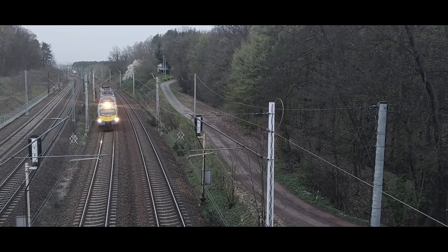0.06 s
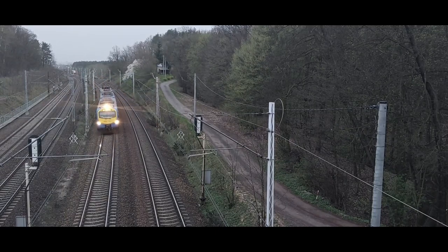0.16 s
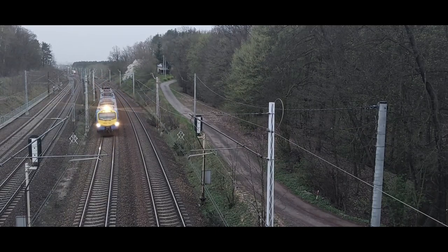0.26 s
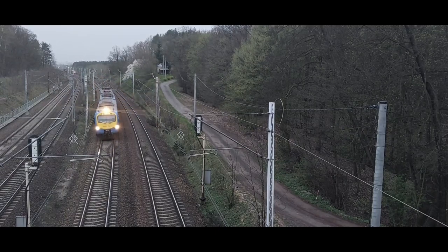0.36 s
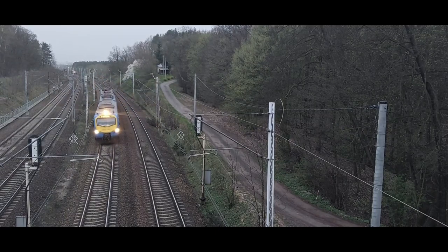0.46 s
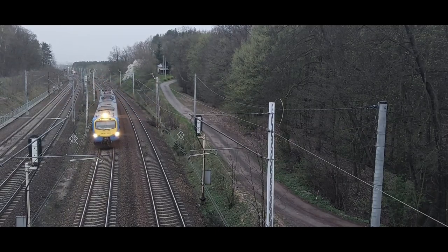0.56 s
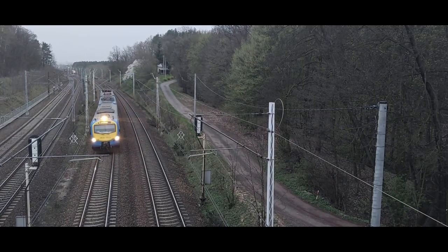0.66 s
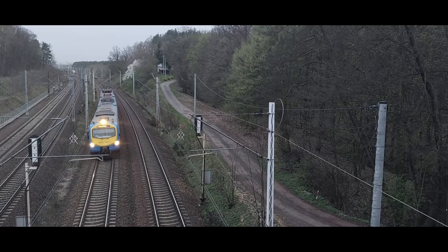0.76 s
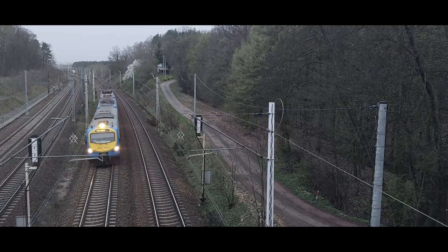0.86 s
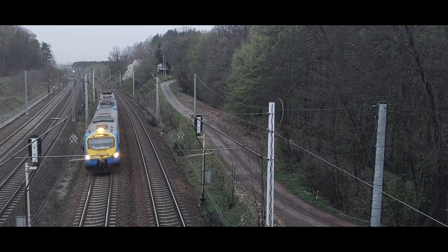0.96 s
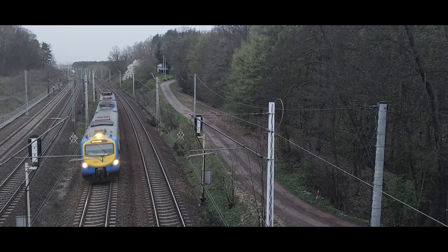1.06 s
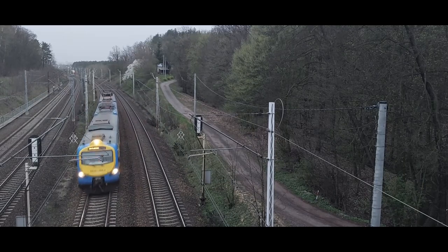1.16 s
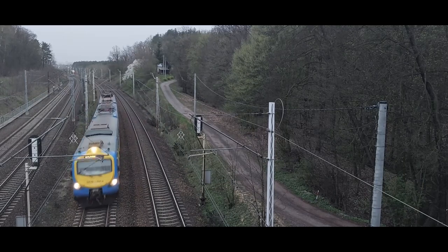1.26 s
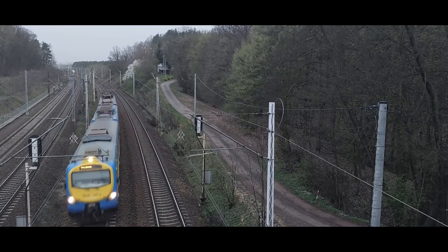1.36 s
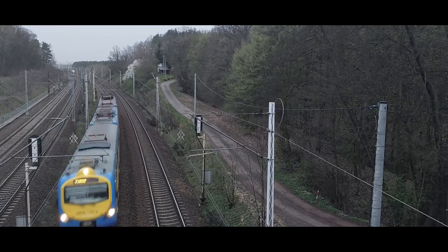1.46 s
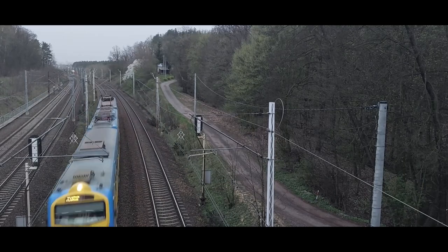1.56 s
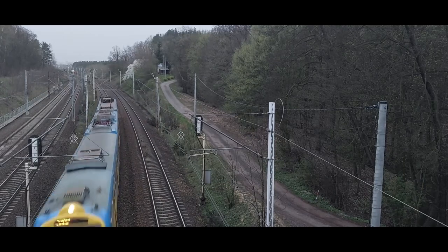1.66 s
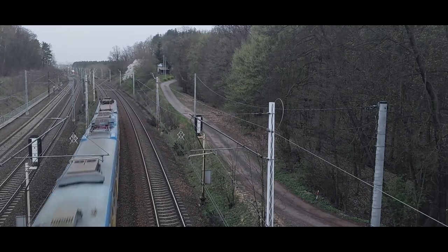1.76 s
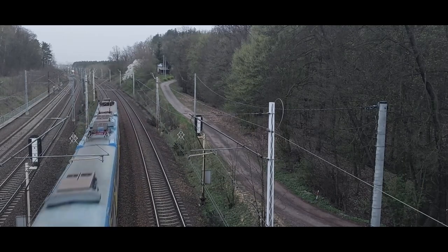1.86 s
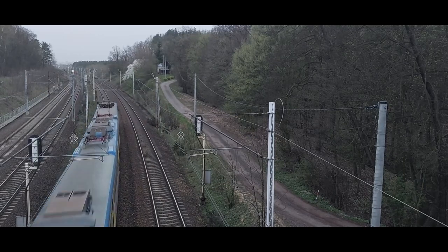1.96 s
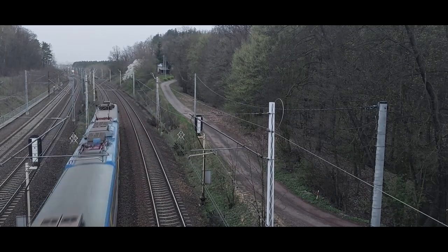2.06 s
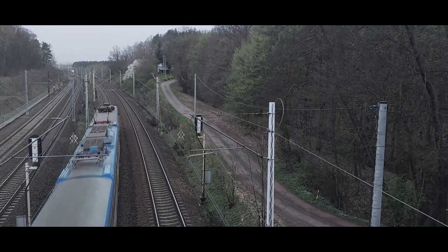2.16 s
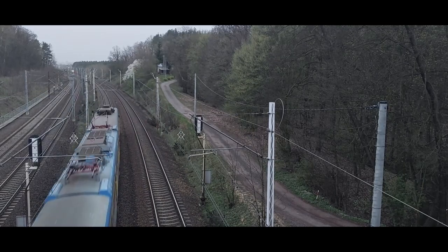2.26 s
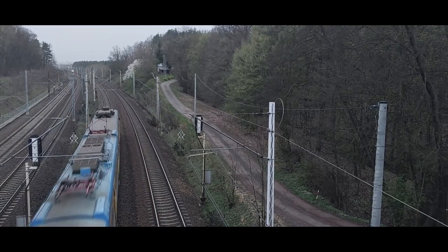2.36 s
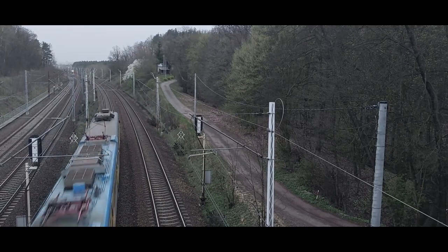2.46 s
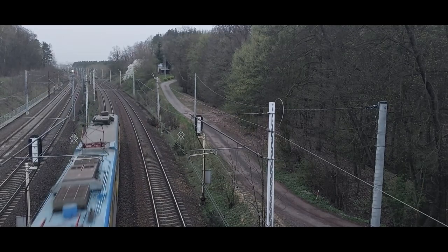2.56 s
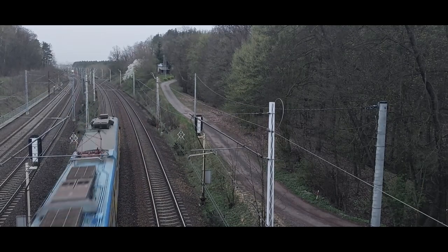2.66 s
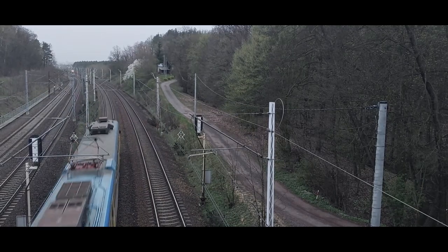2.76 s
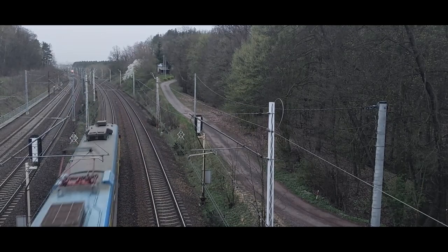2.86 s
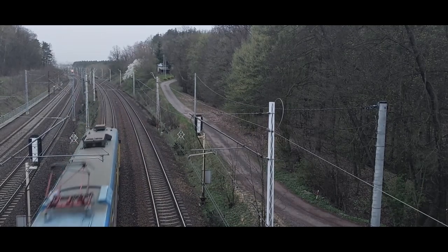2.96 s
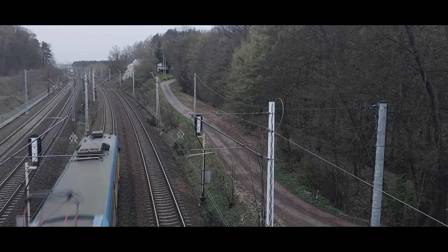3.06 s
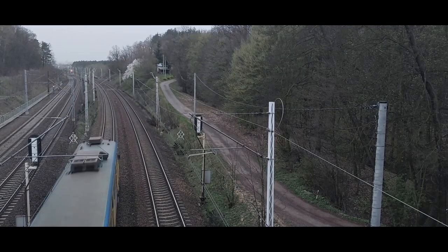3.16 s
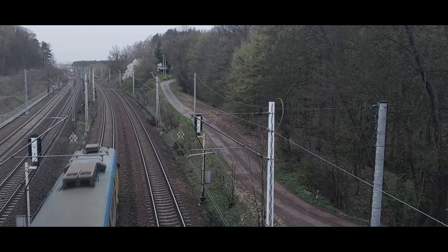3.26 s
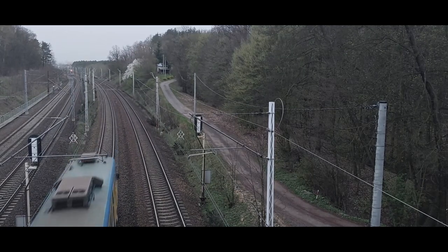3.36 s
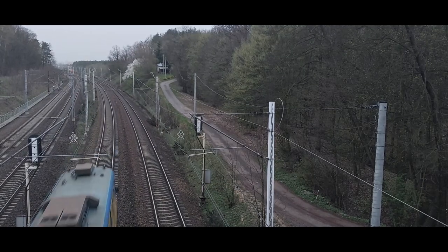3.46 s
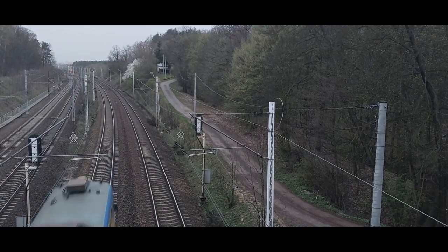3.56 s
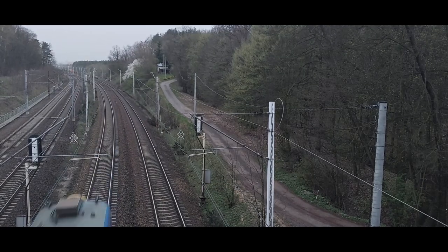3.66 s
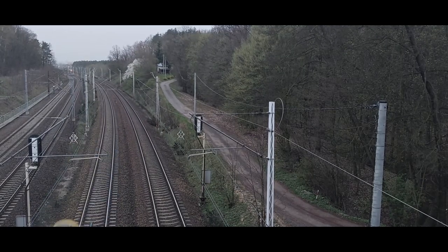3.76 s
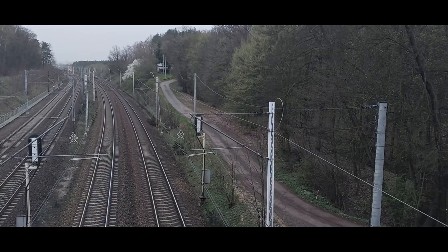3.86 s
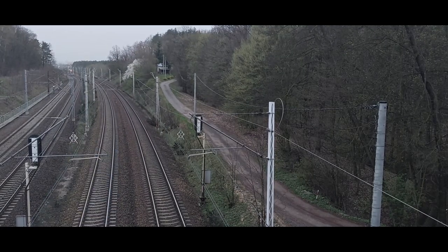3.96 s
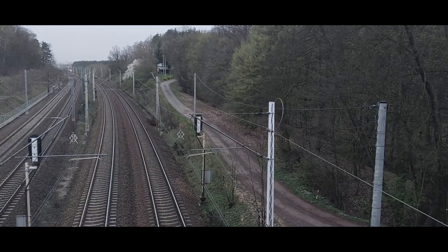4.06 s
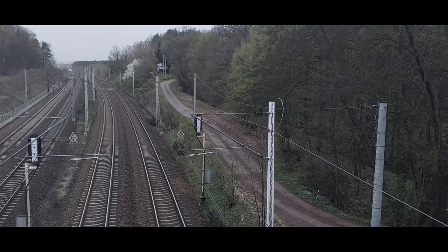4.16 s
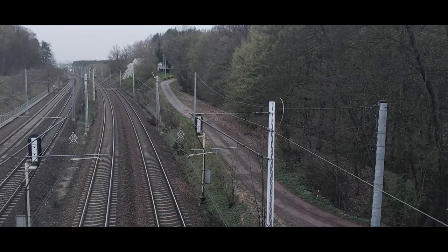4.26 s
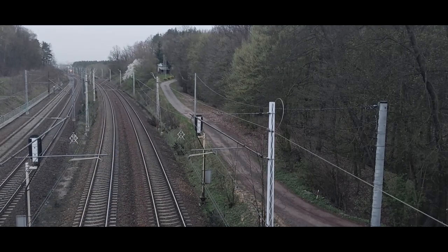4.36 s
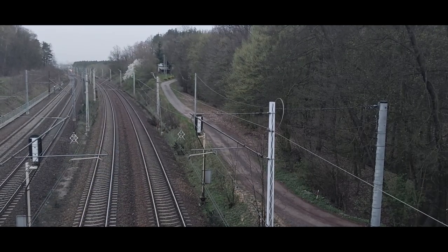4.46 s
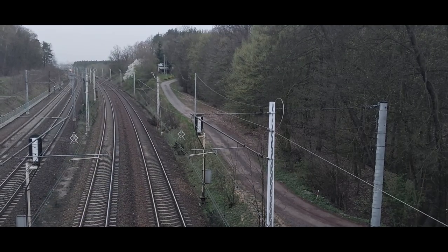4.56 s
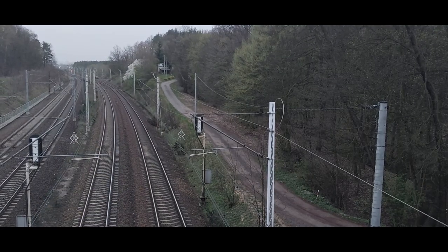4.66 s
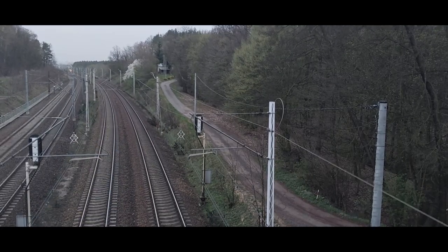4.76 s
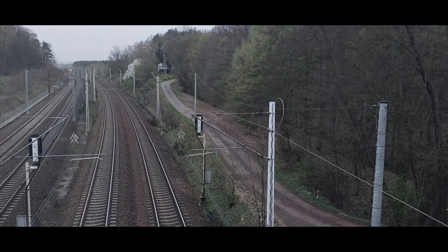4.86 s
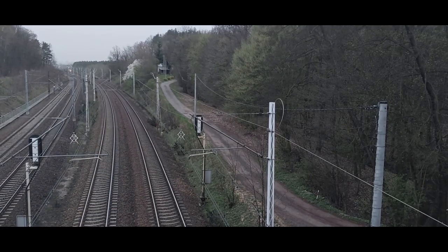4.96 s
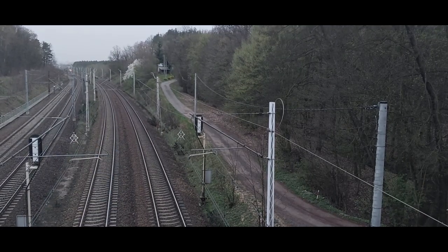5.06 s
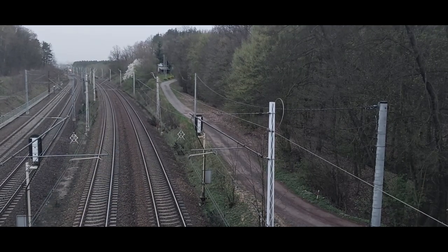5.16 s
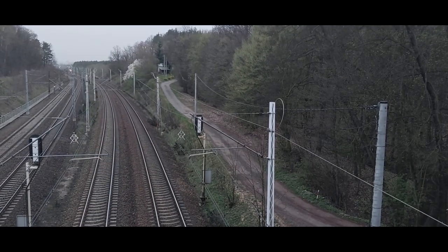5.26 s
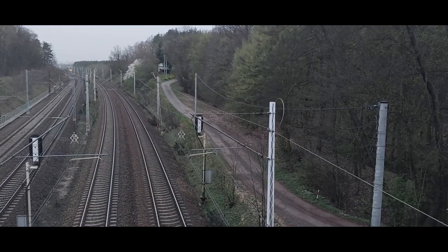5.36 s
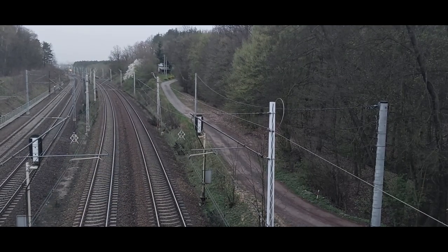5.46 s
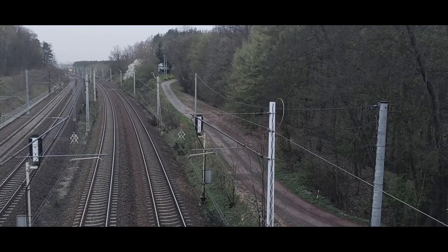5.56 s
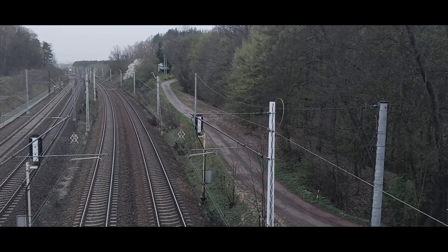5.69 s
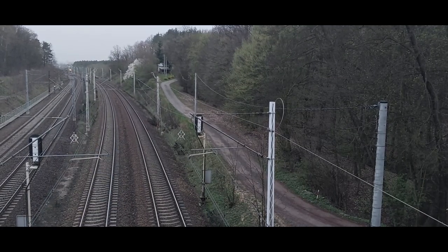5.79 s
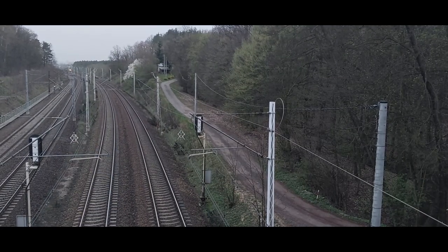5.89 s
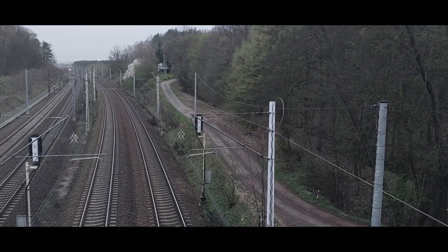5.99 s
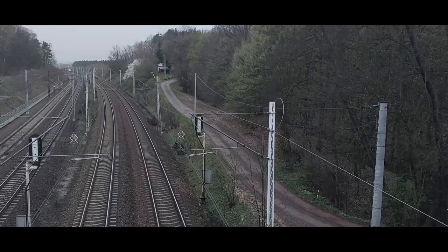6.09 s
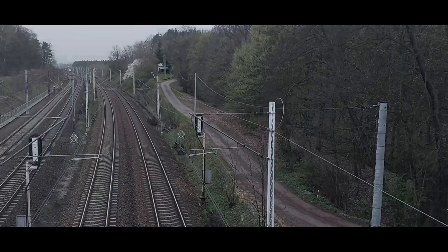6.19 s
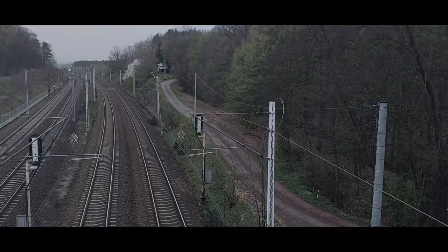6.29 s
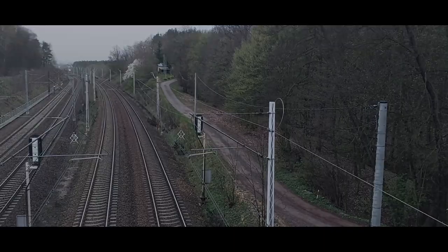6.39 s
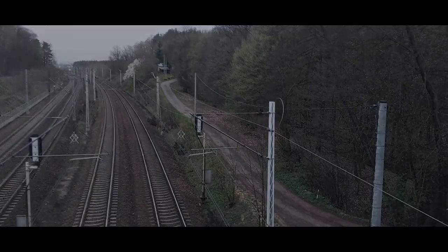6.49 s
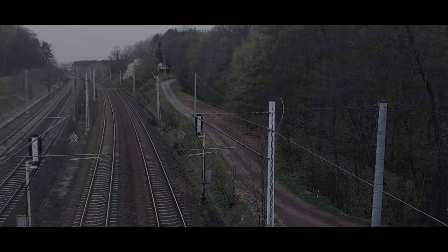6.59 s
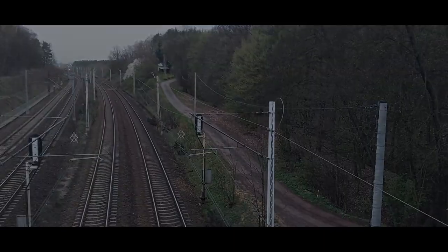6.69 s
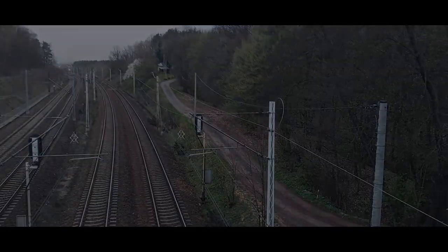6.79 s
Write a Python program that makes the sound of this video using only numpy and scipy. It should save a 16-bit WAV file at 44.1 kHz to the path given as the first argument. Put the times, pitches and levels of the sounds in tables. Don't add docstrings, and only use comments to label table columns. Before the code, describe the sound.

Bright reedy horn blasts echo off woods as an electric train rushes up, booms and hums passing below, then fades to a distant rolling roar.

```python
import sys
import numpy as np
from scipy import signal
from scipy.fft import rfft, irfft, next_fast_len
from scipy.io import wavfile

SR = 44100
rng = np.random.default_rng(int(sys.argv[2]) if len(sys.argv) > 2 else 0)


def digitize_waveform(pressure):
    field = np.atleast_2d(pressure).T
    bounded = np.clip(field, -1, 1)
    quanta = np.round(bounded * 32767).astype(np.int16)
    wavfile.write(sys.argv[1], SR, quanta)


def nominal_scale(level):
    x = np.asarray(level, float) / 20
    return 10 ** x


N = 301185


def in_time(rows, t):
    s, *columns = np.transpose(rows)
    return [np.interp(t, s, c) for c in columns]


def at_hz(points, hz):
    point_hz, db = np.transpose(points)
    return np.interp(np.log(hz), np.log(point_hz), db)


def drift(rate, size):
    r = np.exp(-80 * np.pi * rate / SR)
    noise = rng.standard_normal(size // 40 + 2002)
    slow = signal.lfilter([1], [1, -2 * r, r * r], noise)[2000:]
    return np.interp(np.arange(size) / 40, np.arange(len(slow)), slow / slow.std())


# freq_hz, likeness_0_to_1
LIKENESS = [(60, 0.97), (200, 0.95), (350, 0.89), (520, 0.83), (860, 0.4), (1200, 0.33), (2200, 0.41),
            (4000, 0.017), (12000, 0.045)]
# low_hz, high_hz
ROLL_BANDS = [(300, 1100), (40, 250), (1300, 3000), (3000, 15000)]


def roar_side(spectrum, rings, lead_s, hz):
    shape_db = at_hz(spectrum, hz)
    for top_hz, width_hz, db in rings:
        shape_db = shape_db + db / (1 + ((hz - top_hz) / width_hz * 2) ** 2)
    shared, left, right = rfft(rng.standard_normal((3, 2 * len(hz) - 2)))
    alike = np.clip(at_hz(LIKENESS, hz), 0, 1)
    late = np.exp(-2j * np.pi * hz * lead_s)
    common = np.sqrt(alike) * np.array([shared, shared * late])
    own = np.sqrt(1 - alike) * np.array([left, right])
    both = nominal_scale(shape_db) * (common + own)
    mid_power = abs(both.mean(axis=0)) ** 2 * 2 / (2 * len(hz)) ** 2
    band_power = [mid_power[(hz > lo) & (hz < hi)].sum() for lo, hi in ROLL_BANDS]
    return irfft(both)[:, :N], band_power


# freq_hz, level_db_per_hz
FRONT = [(25, -23), (45, -7.5), (120, -6.5), (300, -2), (480, -1), (1000, 1), (1220, -6), (2000, -3.5),
         (3200, -14.5), (5000, -19.5), (7400, -30), (8700, -41), (12000, -35.5), (15600, -46)]
# freq_hz, level_db_per_hz
BACK = [(25, -27), (45, -1.5), (120, -9.5), (300, -5.5), (480, 0.5), (1000, 3.5), (1220, -3), (2000, 4),
        (3200, -11), (5000, -25), (7400, -39.5), (8700, -45), (12000, -40), (15600, -56)]
# freq_hz, width_hz, lift_db
FRONT_RINGS = [(131, 14, 6), (443, 42, 5), (676, 280, 8), (900, 120, 6), (1457, 123, 10.5)]
# freq_hz, width_hz, lift_db
BACK_RINGS = [(423.7, 33, 5.5), (608, 116, 4.6), (812, 157, 11.2), (1395, 630, 13), (7070, 370, 13)]
# time_s, share_from_behind
BEHIND = [(0, 0), (3.0, 0.064), (3.9, 0.36), (4.5, 0.75), (6.83, 0.94)]
# time_s, level_db
FAR_ROLL = [(0, -40.5), (1.2, -40.5)]
# time_s, level_db
ROLL = [(1.45, -38.5), (1.51, -38), (1.91, -38), (1.93, -39), (2.26, -41), (2.39, -36.5), (3.14, -29),
        (3.77, -32.5), (3.83, -32.5), (3.85, -32.5), (4.51, -37.5), (5.67, -38.5), (6.81, -41.5),
        (6.83, -43)]
# offset_db, change_behind_db, change_far_db
ROLL_TILT = [(-1.5, -3, -9.5), (7.5, 5.5, -6.5), (-6, 4, -7.5)]
# time_s, middle_lift_db, treble_lift_db, length_s
BOOMS = [
    (1.78, 5, 0, 0.07),
    (2.48, -0.5, -1, 0.33),
    (3.138, 1.5, 1.5, 0.2),
    (3.847, 0, 3, 0.18),
    (4.22, 1.5, 0, 0.27),
    (5.7, 0.5, .1, 0.083),
]


def roar(patchy_db, throb_db, far_until_s):
    t, size = np.arange(N) / SR, next_fast_len(N // 2 + 1) * 2
    hz = np.maximum(np.arange(size // 2 + 1) * SR / size, 1)
    front, front_power = roar_side(FRONT, FRONT_RINGS, 70e-6, hz)
    back, back_power = roar_side(BACK, BACK_RINGS, -0.00038, hz)
    share = np.clip(in_time(BEHIND, t)[0], 0, 1)
    mix = rfft(np.sqrt(1 - share) * front + np.sqrt(share) * back, size)

    level_db, = in_time(list(FAR_ROLL) + list(ROLL), t)
    far = np.clip(1 - t / far_until_s, 0, 1)
    bass, middle, treble = [level_db + db + behind_db * share + far_db * far
                            for db, behind_db, far_db in ROLL_TILT]
    booms, hiss = sum(np.outer(lift_db, np.exp(-((t - s) / length_s) ** 2))
                      for s, *lift_db, length_s in BOOMS)
    wanted = [middle + booms, bass + 0.9 * booms, level_db, treble + hiss]
    gains_db = [db - 10 * np.log10((1 - share) * f + share * b)
                for db, f, b in zip(wanted, front_power, back_power)]

    places = np.log2([600, 110, 1900, 5000])
    order = np.argsort(places)
    together, out = throb_db * drift(8.0, N), 0
    for octave in np.arange(4.5, 14.6, .5):
        band = np.cos(np.pi * np.clip(np.log2(hz) - octave, -.5, .5)) ** 2
        weights = [np.interp(octave, places[order], order == k) for k in range(4)]
        gain_db = sum(w * g for w, g in zip(weights, gains_db))
        gain_db = gain_db + together + patchy_db * drift(13, N)
        out = out + nominal_scale(gain_db) * irfft(mix * band)[:, :N]
    return out


# centre_s, half_length_s, level_db
DRONE = [
    (2.986, 0.025, -35.5),
    (3.102, 0.092, -29),
    (3.245, 0.075, -23.5),
    (3.499, 0.053, -33.5),
]


def drone(pitch_hz, sag_hz_per_s):
    t = np.arange(N) / SR
    out, waver = np.zeros(N), 0.98 * drift(19, N)
    for s, length_s, db in DRONE:
        since = t - s
        swell = np.cos(np.pi * np.clip(since / length_s, -1, 1) / 2) ** 2
        turn = 2 * np.pi * (pitch_hz - sag_hz_per_s * since / 2) * since
        out += nominal_scale(db + 6.5) * swell * np.sin(turn + waver)
    return out * nominal_scale(np.array([[.3], [-.3]]))


# centre_s, peak_db, pitch_hz, length_s, left_right_db
CHIRPS = [
    (4.045, -55, 9800, .012, -3),
    (4.05, -55, 12600, .02, 0),
    (5.63, -62, 13000, .003, 0),
    (5.862, -57, 15250, .018, 10),
    (5.885, -66, 15250, .014, 10),
    (5.921, -52, 13700, .003, 3),
    (5.922, -54, 11800, .004, -6),
    (5.94, -57, 15200, .026, 6),
    (6.735, -58, 14500, .004, 0),
]


def chirps():
    out = np.zeros((2, N))
    for s, db, hz, length_s, pan_db in CHIRPS:
        t = np.arange(int(length_s * SR)) / SR
        at = int((s - length_s / 2) * SR)
        note = np.sin(np.pi * t / length_s) * np.sin(2 * np.pi * hz * t)
        out[:, at:at + len(t)] += nominal_scale(db + pan_db * np.array([[.5], [-.5]])) * note
    return out


# freq_hz, t60_s
WOODS = [(500, 1.1), (1600, .75), (4000, .8), (12000, .5)]


def woods(x):
    t = np.arange(SR) / SR
    tail = np.zeros((2, SR))
    for low_hz in 400 * 2 ** np.arange(0, 5.1, .75):
        sos = signal.butter(2, [low_hz, low_hz * 2 ** .75], "band", fs=SR, output="sos")
        noise = signal.sosfilt(sos, rng.standard_normal((2, SR)))
        tail += noise * nominal_scale(-60 * t / at_hz(WOODS, low_hz * 1.3))
    tail *= np.clip((t - .015) / .05, 0, 1)
    return signal.fftconvolve(x, tail / np.sqrt(np.sum(tail ** 2) / 2), axes=1)


# valve_opens_s, valve_shuts_s, strength_db
BLASTS = [
    (-1, .33, -0.5),
    (.49, .69, -.5),
    (.797, 1.1693, -1.25),
]
FILL_S, DRAIN_S, REED_START_S = .052, .058, .014


def air_supply(t):
    opens, shuts, strength_db = np.transpose(BLASTS)
    blast = np.searchsorted(opens, t) - 1
    since_open = t - opens[blast]
    shut = np.maximum(t - shuts[blast], 0)
    pressure = (1 - np.exp(-(since_open - shut) / FILL_S)) * np.exp(-shut / DRAIN_S)
    return pressure, shut, strength_db[blast], np.clip(since_open / REED_START_S, 0, 1)


GROUND_TURNS = (.56, .4, .47)
GROUND_CYCLES_S, ARRIVES_S = 28.8, 3.4
GROUND_FAR, GROUND_NEAR, GROUND_DULL = .12, .85, 2.0


def ground_echo(k, t, near):
    detour = GROUND_CYCLES_S * (1 / (ARRIVES_S - t) - 1 / (ARRIVES_S - 1.0))
    strength = GROUND_FAR + (GROUND_NEAR - GROUND_FAR) * near ** 2
    bounce = strength / (1.0 + (k / GROUND_DULL) ** 2.0)
    turns = k * detour - GROUND_TURNS[min(k, 3) - 1]
    return abs(1.0 - bounce * np.exp(2j * np.pi * turns)) / np.sqrt(1.0 + bounce ** 2)


# multiple, far_left_db, far_right_db, near_left_db, near_right_db, left_lead_rad
OVERTONES = [(1, -12.5, -18.5, -14, -14, 0.4), (2, -15, -11.5, -7, -7.5, -0.36),
             (3, -22, -18, -13, -10, -0.58), (4, -25, -22.5, -20, -25, 0.6),
             (5, -22, -26.5, -21.5, -24.5, -0.26), (6, -34, -24.5, -28, -23.5, 0.27),
             (7, -27.5, -32, -27, -26, -0.4), (8, -34.1, -28.5, -29.5, -29.5, -0.21),
             (9, -31.5, -48, -36.8, -32, 0.075), (10, -44, -41, -40.5, -42, -0.3),
             (11, -51.7, -47, -61, -44.5, -0.0091), (12, -42.5, -53, -41, -44, 0.56),
             (13, -40, -48.6, -38.5, -38, 0.22), (14, -41.5, -44, -42, -42.5, -0.68),
             (15, -62, -54, -33, -38, -0.51), (16, -48.5, -48, -41, -40, -0.96),
             (17, -44, -52.0, -52, -48.9, -0.2), (18, -54, -56.6, -38, -47.9, -0.3),
             (19, -54, -60.1, -50, -51.5, 0.1)]
# time_s, lead_s
HORN_LEAD = [(.3, 146e-6), (.9, 150e-6), (1.2, 157e-6)]
# freq_hz, level_db_per_hz
AIR = [(2500, -30), (5000, -8), (7500, -8), (9000, -20), (12500, -12), (15500, -22)]
RUN_IN = SR // 3
REED_HZ, REED_SAG_HZ = 810.5, 34
LOW_POWERS, HIGH_POWER = (.5, .9, .15), 1.9
LOW_RELEASE_DB_PER_S, HIGH_RELEASE_DB_PER_S, REED_STOP_S = 130, 650, .085
HIGH_FADE = 2.4
AIR_NEAR_DB, PUFF_DB, PUFF_S = 7, -55, .016


def horn(fade_db, flutter_db, wobble, spread, low_db, bright_db, air_db):
    t = (np.arange(RUN_IN + int(1.4 * SR)) - RUN_IN) / SR
    pressure, shut, strength_db, valve = air_supply(t)
    filled_db = 20 * np.log10(pressure * np.exp(shut / DRAIN_S) + 0.032)
    low = strength_db + low_db - LOW_RELEASE_DB_PER_S * shut - 10 * (shut / REED_STOP_S) ** 2
    high = strength_db + bright_db + HIGH_POWER * filled_db - HIGH_RELEASE_DB_PER_S * shut
    pitch_hz = REED_HZ - REED_SAG_HZ * (1 - pressure)
    turn = 2 * np.pi * np.cumsum(pitch_hz) / SR
    lead_s, = in_time(HORN_LEAD, t)
    near = np.clip((t - .25) / .65, 0, 1)
    table = np.array(OVERTONES)
    port_db = table[:, 1:3, None] * (1 - near) + table[:, 3:5, None] * near

    out = np.zeros((2, len(t)))
    for k, db in enumerate(port_db, start=1):
        db = db + (low + LOW_POWERS[k - 1] * filled_db if k < 4 else high)
        ground = ground_echo(k, t, near)
        depth_db = fade_db * (1 if k < 4 else HIGH_FADE)
        common, waver = drift(11.0, len(t)), wobble * drift(34.0, len(t))
        for side in (0, 1):
            shimmer_db = flutter_db * np.sqrt(k) * drift(70, len(t))
            path_db = depth_db * (.6 * common + .8 * drift(12, len(t)))
            fading = nominal_scale(db[side] + path_db + shimmer_db)
            late = side * (k * 2 * np.pi * pitch_hz * lead_s + table[k - 1, 5])
            own_waver = .5 * wobble * drift(25.0, len(t))
            phase = k * turn - late - spread * k * k + waver + own_waver
            out[side] += ground * fading * np.cos(phase)

    hz = np.maximum(np.arange(len(t) // 2 + 1) * SR / len(t), 1)
    air = irfft(rfft(rng.standard_normal(out.shape)) * nominal_scale(at_hz(AIR, hz)), len(t))
    puffs = sum(np.exp(-((t - s) / PUFF_S) ** 2)
                for opens, shuts, _ in BLASTS for s in (opens + PUFF_S, shuts))
    leak = nominal_scale(high + air_db + AIR_NEAR_DB * near) + nominal_scale(PUFF_DB) * puffs
    return (out + leak * air / air.std()) * valve


def scene():
    blown = horn(fade_db=.9, flutter_db=.45, wobble=.11, spread=.3, low_db=-1.03, bright_db=1.3, air_db=-60)
    echo = nominal_scale(-20.5) * woods(blown)
    out = roar(patchy_db=0.7, throb_db=.3, far_until_s=2.42)
    out += drone(pitch_hz=257.4, sag_hz_per_s=110) + chirps()
    for layer in (blown, echo):
        out[:, :layer.shape[1] - RUN_IN] += layer[:, RUN_IN:]
    return out


def roll_off(x):
    return signal.sosfilt(signal.butter(12, 15640, fs=SR, output="sos"), x)


def record(dry):
    mix = np.clip(dry, -1, 1)
    return roll_off(mix)


dry = scene()
out = record(dry)
digitize_waveform(out)
```